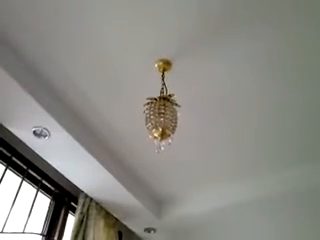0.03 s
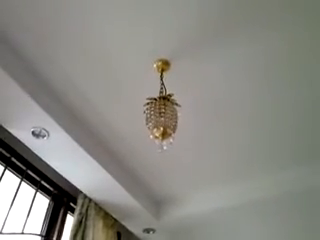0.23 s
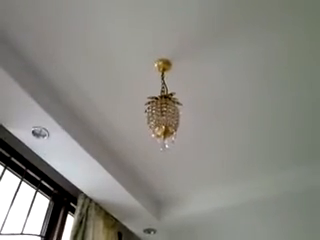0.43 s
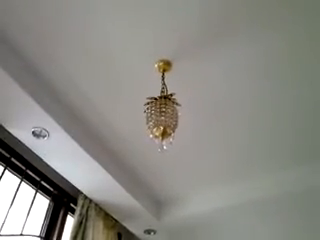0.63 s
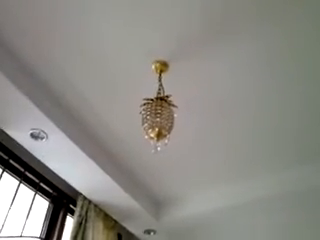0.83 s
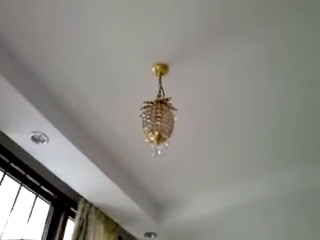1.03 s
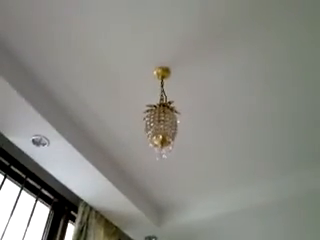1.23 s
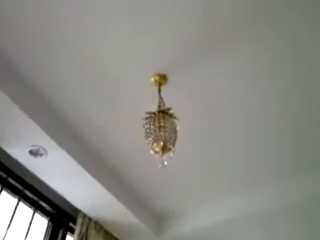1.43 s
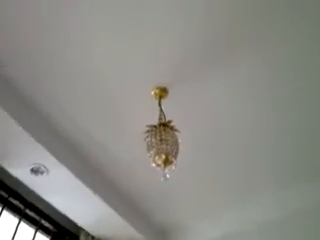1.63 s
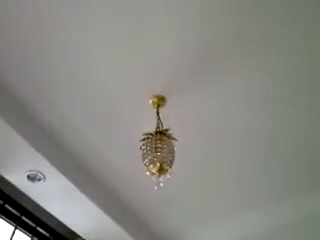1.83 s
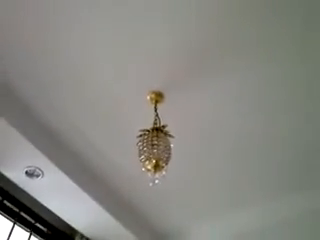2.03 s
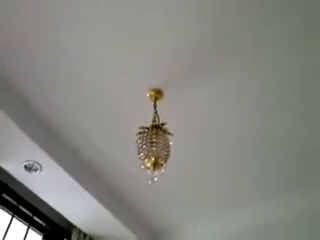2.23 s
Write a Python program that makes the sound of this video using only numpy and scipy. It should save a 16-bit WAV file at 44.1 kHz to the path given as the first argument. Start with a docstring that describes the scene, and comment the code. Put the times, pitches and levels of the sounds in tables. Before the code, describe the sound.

Sharp snaps and clicks come in a quick cluster as fingers handle a hard case right at the microphone. Light scraping and a few gentler knocks trail off, then a faint low hum swells in the quiet room.

```python
"""A small hard object, probably the plastic case around the microphone, is handled in a quiet room.
At 0.2 s it snaps sharply a few times: impacts excite its damped modes, and the loudest snaps are
softly clipped. From 0.33 s fingers scrape over it in stick-slip friction, and softer knocks follow until
about 1.5 s. Near 1.4 s a low hum swells, and one last faint scrape comes just before the end.
A low rumble, a faint wavering drone and hiss lie behind it throughout."""
import sys
import numpy as np
from scipy import signal
from scipy.fft import rfft, irfft
from scipy.io import wavfile
from scipy.ndimage import uniform_filter1d

SR = 44100
rng = np.random.default_rng(int(sys.argv[2]) if len(sys.argv) > 2 else 0)


def persist_wave(psi):
    """Save psi, clipped to +-1, as 16-bit WAV."""
    counts = np.round(np.clip(psi, -1, 1) * 32767).astype(np.int16)
    wavfile.write(sys.argv[1], SR, np.atleast_2d(counts).T)


N = 101429

# impacts on the case: t/s, drive level/dB in each of five bands (thump, knock, clack, snap, tick),
# delay/s and relative level/dB of the second contact
IMPACTS = [(0.2064, 0, 6.5, 8.5, 8, 20, 0.0014, -9), (0.2524, -6.5, -16.5, -7.5, -0.5, -10, 0.00042, 7.5),
           (.3050, -19, -35.5, -33, -29.5, -50, 0.00037, -2), (.3220, -27, -18, -4.5, -4, -27, 0.00044, -4),
           (0.3462, 14, 9.5, 14.5, 13.5, 10, .00040, 3), (.3695, -17.5, -2.5, -15.5, -15, -28, 0.0026, 0.5),
           (.4610, -15.5, -22.5, -24.5, -24.5, -35, .0019, 1.5),
           (.6165, -28, -23, -28.5, -29, -39, 0.0011, -4), (.6275, -26, -20, -18, -31, -33, 0.0019, -3.5),
           (.6475, -26.5, -29.5, -26, -32, -39, 0.0015, -1),
           (0.6912, -8, -2, -0.5, -11.5, -22, .0022, -5.5),
           (.8045, -16.5, -21.5, -33, -49, -49, 0.00148, -3.5),
           (.9225, 4, -15, -32.5, -33, -40, .0019, -5.5), (.9490, -6.5, -30.5, -52, -44, -48.5, 0.002, -6),
           (1.2400, -22, -5, -26.5, -9, -24, .00054, -4.5), (1.5372, 6.5, -3, -16, -22, -29, 0.00075, 6)]
# centres of the five drive bands: f/Hz
DRIVE_BANDS = [520, 1150, 2550, 4700, 7500]
# normal modes of the case: f/Hz, level/dB, T60/s
CASE_MODES = [(504, 0, 0.035), (720, -1, .012), (885.2, -4.5, 0.0099), (1145, 2.5, 0.014),
              (1560, -1, 0.0071), (2055, -1.5, .005), (2520, 0, 0.007), (2919, -2, .005),
              (3550, -1.5, 0.0072), (4260, -4.5, 0.0036), (4860, -3, 0.0033), (5993, -3.5, 0.0019),
              (7200, -1.5, .005), (8200, -4.5, .004)]
# normal modes of a small stiff part, perhaps a catch: f/Hz, level/dB, T60/s
CATCH_MODES = [(990, -4, .03), (2940, 12, .012), (3800, 11, .012), (5500, 8, 0.029), (6600, 11, .06),
               (7340, 19, 0.0064)]
# finger strokes: t/s, duration/s, level/dB, centre f/Hz, narrowing/(dB per octave squared)
STROKES = [(0.331, 0.038, -40, 3282, -1), (0.461, 0.13, -63.5, 2800, -0.5), (0.495, 0.038, -44, 3300, 3),
           (0.604, 0.042, -60.5, 2200, 1.5), (1.167, 0.072, -71, 6476, 32.5), (2.243, .06, -75, 5290, 10)]
# spectral envelope of friction on the case: f/Hz, relative level/dB
FRICTION_SPECTRUM = [(400, -18), (1100, -11), (1600, -11.5), (2150, -10.5), (2520, 2), (2950, -3.5),
                     (3350, -10.5), (3800, -5.5), (4150, -9), (4750, -6), (5500, -11), (8300, -15.5)]
# spectral density of the background noise: f/Hz, relative level/dB
NOISE_SPECTRUM = [(12, -42.5), (20, -15.5), (58, 1.5), (118, -8), (164, -9.5), (265, -10), (300, -9.5),
                  (359, -18.5), (397, -16), (848, -28), (1210, -30.5), (1680, -40.5), (8500, -50),
                  (11000, -82.5), (18700, -120)]
# slow swell of the rumble: t/s, relative level/dB
RUMBLE_SWELL = [(0, -4), (.5, -2.5), (.8, -5), (1.1, 0), (1.3, -0.5), (1.6, 2), (1.9, -2.5), (2.3, 1.5)]
# tones of the drone: f/Hz, level/dB
DRONE_TONES = [(65, -57), (99, -60.5), (134, -62.5), (205, -61), (300, -65)]
# envelope of the hum: t/s, level/dB
HUM_ENVELOPE = [(0, -71.5), (1.32, -68.5), (1.42, -52), (1.68, -54.5), (1.92, -48.5), (2.1, -63),
                (2.3, -57)]

CONTACT_S, CATCH_AT_S = 0.0004, 0.2067
STROKE_RISE_S, STROKE_FALL_S, SLIPS_PER_S, SLIP_SPREAD_DB = 0.007, 0.00806, 5880, 5.5
NOISE_DB, FLICKER_DB, RUMBLE_CORNER_HZ, HUM_HZ = -49.5, 1.5, 200, 166
CEILING, CUTOFF_HZ, LEAK_DB, HISS_DB, BAND_LIMIT_HZ = 0.79, 9020, -17, -103, 15870


def case_impacts():
    """Modal superposition: two quick contacts ring the case, and their interference sounds hollow."""
    out, t = np.zeros(N), np.arange(SR // 10) / SR
    for start, *drive_db, delay, second_db in IMPACTS:
        drive = list(zip(DRIVE_BANDS, drive_db))
        for k, (hz, db, t60) in enumerate(CASE_MODES):
            pair = damped_mode(t, hz, t60) + amp(second_db) * damped_mode(t - delay, hz, t60)
            gain = amp(db + level_at(drive, hz))
            add(out, start, (-1) ** k * gain * pair)  # neighbouring modes alternate in sign
    return out


def catch_ring():
    """Free vibration: the first snap also sets a small stiff part ringing, briefly and brightly."""
    out, t = np.zeros(N), np.arange(SR // 10) / SR
    add(out, CATCH_AT_S, sum(amp(db) * damped_mode(t, hz, t60) for hz, db, t60 in CATCH_MODES))
    return out


def damped_mode(t, hz, t60):
    """A damped oscillator builds up during a contact at t = 0, then decays; gain 1 at resonance."""
    t = np.maximum(t, 0)
    build_up = 1 - np.exp(-(t / CONTACT_S) ** 2)
    envelope = build_up * np.exp(-np.log(1000) * t / t60)
    return 2 * envelope / envelope.sum() * np.sin(2 * np.pi * hz * t)


def finger_scrapes():
    """Stick-slip friction: dense random impulses, filtered by the case and by the kind of stroke."""
    out, t = np.zeros(N), np.arange(SR // 4) / SR
    hz = np.fft.rfftfreq(len(t), 1 / SR)
    for start, duration, db, centre_hz, narrowing in STROKES:
        slips = rng.standard_normal(len(t)) * (rng.random(len(t)) < SLIPS_PER_S / SR)
        slips *= amp(SLIP_SPREAD_DB * np.minimum(rng.exponential(1, len(t)), 2))
        octaves = np.log2(np.maximum(hz, DRIVE_BANDS[0]) / centre_hz)
        response = amp(level_at(FRICTION_SPECTRUM, hz) - narrowing * octaves ** 2)
        friction = unit_rms(irfft(rfft(slips) * response, len(t)))
        rise = np.minimum(t / STROKE_RISE_S, 1)
        fall = np.exp(-np.maximum(t - duration, 0) / STROKE_FALL_S)
        add(out, start, amp(db) * rise * fall * friction)
    return out


def reflections(x, db, t60):
    """Diffuse reverberation: dense echoes build within two milliseconds and decay exponentially."""
    t = np.arange(SR // 2) / SR
    build_up = np.minimum(t / 0.0014, 1) ** 2
    tail = rng.standard_normal(len(t)) * build_up * np.exp(-np.log(1000) * t / t60)
    return amp(db) * signal.fftconvolve(x, tail / np.linalg.norm(tail))[:N]


def rumble():
    """Spectrally shaped noise: the bass swells slowly, and the treble thins into hiss."""
    size, hop = 2048, 512
    t, hz = np.arange(N // hop + 5) * hop / SR, np.fft.rfftfreq(size, 1 / SR)
    real, imag, flicker = rng.standard_normal((3, len(t), len(hz)))
    flicker = uniform_filter1d(flicker, size=6, axis=0)  # smooth in time, then in frequency
    flicker = unit_rms(uniform_filter1d(flicker, size=14, axis=1))
    swell_db = np.interp(t, *np.transpose(RUMBLE_SWELL))[:, None] / (1 + (hz / RUMBLE_CORNER_HZ) ** 2)
    spectra = (real + 1j * imag) * amp(level_at(NOISE_SPECTRUM, hz) + swell_db + FLICKER_DB * flicker)
    _, noise = signal.istft(spectra.T, nperseg=size, noverlap=size - hop)
    return amp(NOISE_DB) * unit_rms(noise[:N])


def drone():
    """Superposed faint low tones, like distant machinery or traffic; one of them, the hum, swells."""
    hum_db = np.interp(np.arange(N) / SR, *np.transpose(HUM_ENVELOPE))
    hum = amp(hum_db) * wavering_tone(HUM_HZ, pitch_depth=0.004, depth_db=3.5)
    return hum + sum(amp(db) * wavering_tone(hz, pitch_depth=0.012, depth_db=3) for hz, db in DRONE_TONES)


def wavering_tone(hz, pitch_depth, depth_db):
    """Random frequency and amplitude modulation make a sinusoid waver; rms 1."""
    phase = 2 * np.pi * np.cumsum(hz * (1 + pitch_depth * drift(rate_hz=5))) / SR
    return unit_rms(np.sin(phase) * amp(depth_db * drift(rate_hz=5.9)))


def drift(rate_hz):
    """Low-pass filtered noise wanders slowly; rms 1."""
    hz = np.fft.rfftfreq(N, 1 / SR)
    return unit_rms(irfft(rfft(rng.standard_normal(N)) * np.exp(-(hz / rate_hz) ** 2), N))


def amp(db):
    """Amplitude ratio of a level in decibels."""
    return 10 ** (np.asarray(db) / 20)


def unit_rms(x):
    """Normalisation to rms 1."""
    return x / np.sqrt(np.mean(x ** 2) + 1e-20)


def level_at(spectrum, hz):
    """Interpolation of a spectrum on a logarithmic frequency axis."""
    f, db = np.transpose(spectrum)
    return np.interp(np.log(hz + 1), np.log(f + 1), db)


def add(mix, start, sound):
    """Linear superposition of a sound on the mix, from a start time in seconds."""
    part = mix[max(round(start * SR), 0):][:len(sound)]
    part += sound[:len(part)]


def low_pass(x, hz, taps):
    """Convolution with a windowed sinc cuts steeply above hz."""
    return signal.fftconvolve(x, signal.firwin(taps, hz, window="blackmanharris", fs=SR), "same")


def scene():
    """Direct sound, early reflections, the room's duller tail and the background superpose."""
    direct = case_impacts() + catch_ring() + finger_scrapes()
    early = reflections(direct, db=-14.5, t60=0.026)
    dulled = signal.lfilter(*signal.butter(1, 3500, fs=SR), direct)  # treble falls above 3500 Hz
    room_tail = reflections(dulled, db=-28.5, t60=0.2)
    return (direct + early + room_tail + rumble() + drone())[None]


def record(dry):
    """The loudest snaps are softly clipped and band-limited, with faint distortion above the cutoff."""
    clipped = CEILING * np.tanh(low_pass(dry[0], CUTOFF_HZ, taps=201) / CEILING)
    in_band = low_pass(clipped, CUTOFF_HZ, taps=201)
    leak = amp(LEAK_DB) * (clipped - in_band)
    hiss = amp(HISS_DB) * rng.standard_normal(N)
    return low_pass(in_band + leak + hiss, BAND_LIMIT_HZ, taps=511)[None]


dry = scene()
out = record(dry)
persist_wave(out)
```